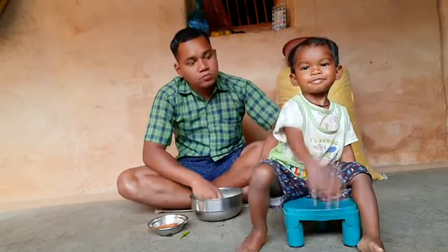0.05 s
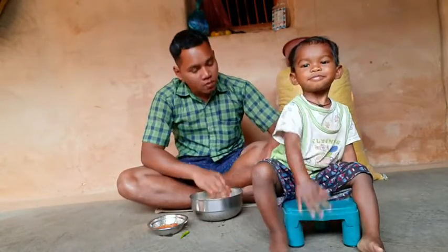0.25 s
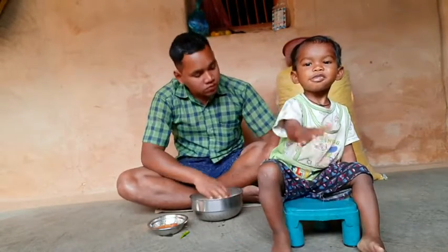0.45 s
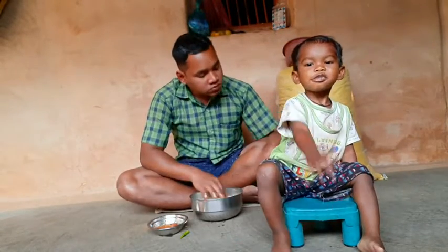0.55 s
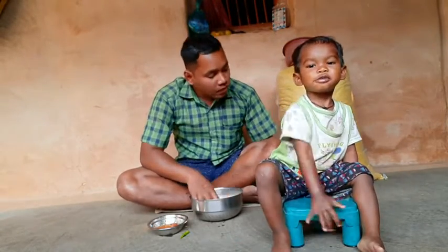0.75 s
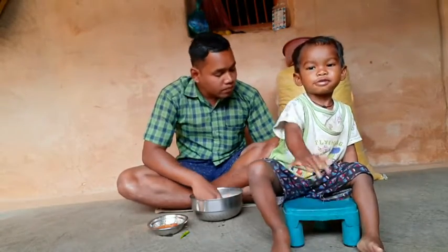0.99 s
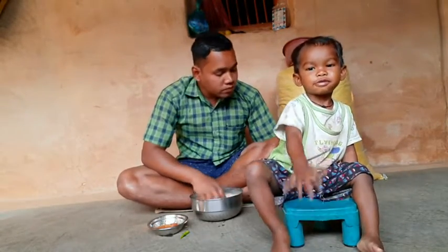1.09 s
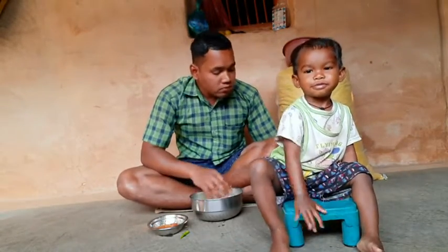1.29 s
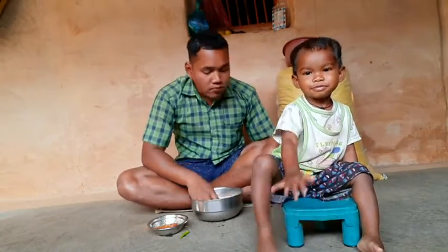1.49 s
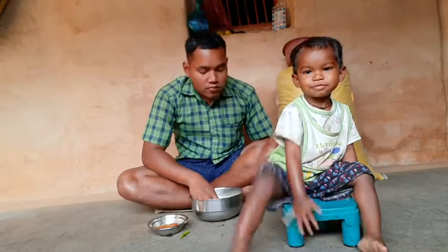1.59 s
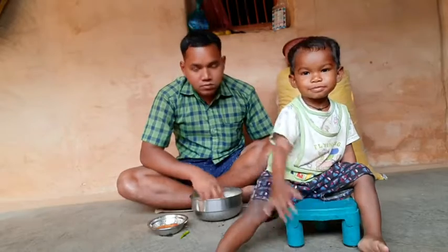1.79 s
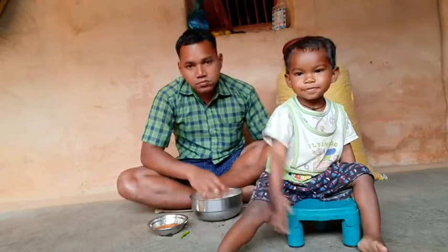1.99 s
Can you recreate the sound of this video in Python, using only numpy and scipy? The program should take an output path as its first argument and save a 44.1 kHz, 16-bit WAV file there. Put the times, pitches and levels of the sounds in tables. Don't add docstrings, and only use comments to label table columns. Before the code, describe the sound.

A child's hand slaps a hollow plastic stool, one hard hit then lighter uneven ones, with skin snaps and faint wet ticks; stool legs scrape at start and end. Close stereo microphone, small bare room, low hum.

```python
import sys
import numpy as np
from scipy import signal
from scipy.fft import rfft, irfft, next_fast_len
from scipy.io import wavfile
from scipy.ndimage import uniform_filter1d, map_coordinates

SR = 44100
rng = np.random.default_rng(int(sys.argv[2]) if len(sys.argv) > 2 else 0)


def boost_factor(decibels):
    exponent = np.asarray(decibels, float) / 20
    return 10 ** exponent


def unload_wav(signal):
    wavfile.write(
        sys.argv[1],
        SR,
        np.round(np.clip(np.atleast_2d(signal).T, -1, 1) * 32767).astype(np.int16),
    )


N = 90404

# frequency in Hz, level in dB, decay time t60 in seconds, rim share 0-1.
STOOL_MODES = [(109.3, 10, 0.22, 0.26), (176.7, -5.5, 0.22, 0.59), (253.6, 4, 0.2, 0.31),
               (347.6, 3.5, 0.15, 0.93), (420.4, 2, 0.17, 0.37), (481, -17.5, 0.32, 0),
               (499.1, -4, 0.21, 0.04), (542.5, -2.5, 0.174, 0.26), (597.8, -14.5, 0.31, 0.99),
               (649, -27, 0.16, 0.1), (679, -27, 0.38, 1), (953, -15.5, 0.1, 0), (667, -41, 0.023, 0.2)]
RISE_S = 0.0021


def ringing(centre_hz, width_oct, rim_db, ring):
    t = np.arange(SR // 2) / SR
    hz, db, t60, rim = np.transpose(STOOL_MODES)[..., None]
    octaves_off = np.log2(hz / centre_hz) / width_oct
    weight_db = db + rim * rim_db - 6 * octaves_off ** 2
    decay = boost_factor(weight_db - 60 * t / (ring * t60))
    modes = decay * np.sin(2 * np.pi * hz * t)
    return modes.sum(0) * (1 - np.exp(-t / RISE_S)) ** 2


# start in seconds, level in dB, centre of the push in Hz,
# rim mode level in dB, ring length 0-1 as the hand damps it.
SLAPS = [(.245, -21.5, 407, -21, 0.78), (.257, -28, 547, -3, 0.61), (.242, -45, 381, 10, 0.26),
         (0.779, -32, 467, -15, 0.37), (.791, -28.5, 493, -6.5, 0.57), (.797, -42, 403, -10, 0.2),
         (.79, -53, 100, -2, 0.61), (1.073, -38.5, 320, 6, 0.34), (1.091, -47, 363, 10.5, 0.54),
         (1.106, -52, 600, 9.5, 0.39), (1.322, -27, 422, -5, 0.9), (1.337, -30.5, 420, -6, 0.51),
         (1.328, -42, 300, -9, 0.2), (1.585, -35.5, 365, 6.5, 0.34), (1.599, -32.5, 396, -14, 0.07),
         (1.618, -40, 610, 11.5, 0.22), (1.731, -37, 525, 0.5, 0.58), (1.746, -43, 313, 12, 0.25),
         (1.765, -46, 400, 4, 0.26), (1.784, -52, 151, -6, 0.36), (1.799, -49, 255, 3, 0.53),
         (1.812, -50.5, 257, 14.5, 0.24), (1.826, -53.5, 300, 0, 0.47)]
PUSH_OCT = 0.96
SEAT_DIP_HZ, SEAT_DIP_Q, SEAT_DIP = 790, 2.5, 0.85


def slapped_seat():
    out = np.zeros(N + SR)
    for s, db, hz, rim_db, ring in SLAPS:
        out[round(s * SR):][:SR // 2] += boost_factor(db) * ringing(hz, PUSH_OCT, rim_db, ring)
    dip = resonance(SEAT_DIP_HZ, SEAT_DIP_Q)
    return filtered(out[:N], lambda f: 1 - SEAT_DIP * dip(f))


# time in seconds, level in dB.
DRAG = [
    (0, -71.5),
    (.08, -68.5),
    (.13, -57),
    (.19, -67),
    (.3, -87),
    (1.55, -79.5),
    (1.63, -64),
    (1.7, -64.5),
    (1.78, -48.5),
    (1.92, -87),
]
DRAG_HZ, DRAG_OCT, DRAG_RING, DRAG_RIM_DB = 203, 0.74, 0.32, 4.5
SCUFF_HZ, SCUFF_Q, SCUFF_DB = 217.8, 1.5, -2


def dragged_legs():
    drag_s, drag_db = np.transpose(DRAG)
    level_db = np.interp(np.arange(N) / SR, drag_s, drag_db)
    slips = unit(boost_factor(0.69 * wobble(90)) * rng.standard_normal(N))
    scuff = boost_factor(level_db + SCUFF_DB) * unit(filtered(slips, resonance(SCUFF_HZ, SCUFF_Q)))
    body = ringing(DRAG_HZ, DRAG_OCT, DRAG_RIM_DB, DRAG_RING)
    shaken = signal.fftconvolve(slips * boost_factor(level_db), body / np.linalg.norm(body))[:N]
    return scuff + shaken


# start in seconds, level in dB, hollow frequency in Hz,
# hollow over hiss in dB, length t60 in seconds.
SNAPS = [(0.2418, -35.5, 1436, 6.5, 0.016), (.243, -29.5, 4880, -11, 0.0073), (.243, -41, 3170, 14, 0.0054),
         (.244, -34.5, 8450, 8, .006), (0.294, -48, 4580, -1.5, 0.056), (.31, -59, 4530, 1, .015),
         (0.345, -60, 1500, 13, 0.009), (0.755, -62, 1500, 22, 0.0075), (.767, -67, 1510, 17, 0.011),
         (0.775, -48, 3530, 1.5, 0.018), (.779, -59.5, 1420, 17.5, .01), (0.789, -56.5, 4940, 6.5, 0.0097),
         (0.801, -62, 910, 21, 0.022), (1.083, -79, 1830, 22, 0.023), (1.094, -67.5, 1710, 20, 0.009),
         (1.32, -44, 4770, 0, 0.0099), (1.321, -51, 8300, 15, 0.0063), (1.319, -60.5, 1460, 14.5, 0.013),
         (1.581, -67.5, 1380, 19, 0.012), (1.584, -61, 1960, 17, 0.021), (1.716, -58, 8700, -5, 0.02),
         (1.731, -45, 3210, 10, 0.011), (1.730, -54, 6100, -6, 0.0063), (1.794, -51.5, 4970, 2, 0.0098),
         (1.826, -58, 3100, 11, .01), (1.827, -60, 7500, 0, 0.0073), (1.836, -70, 3300, 14, 0.0089),
         (1.847, -63, 4750, 12, 0.013), (1.839, -64, 1740, 15, 0.01), (1.838, -60, 11100, 4, 0.032),
         (1.8476, -56, 1497, 18, 0.0099), (1.85, -59.5, 7400, 13.5, 0.013),
         (1.866, -67, 1150, 15.5, 0.0095)]
# start in seconds, level in dB, hollow frequency in Hz,
# hollow over hiss in dB, length t60 in seconds.
TICKS = [
    (.499, -49, 9500, -2, .009),
    (.504, -54, 8000, 2, .01),
    (.521, -46, 8500, -4, .009),
    (.739, -55, 7600, 0, .012),
    (.747, -49, 9200, -2, .022),
    (.426, -62, 12000, -6, .01),
]
# frequency in Hz, level in dB.
SNAP_COLOUR = [(900, -10), (1450, 23), (2200, -14), (3200, 14.5), (4000, -1), (5000, 3.5), (8500, -4.5),
               (15500, -9.5)]
SNAP_RISE_S, HISS_FROM = 0.00045, 0.6
HOLLOW_Q, HOLLOW_RISE_CYCLES, HOLLOW_CLEAR = 3.5, 1.95, 0.62
SNAP_WET_DB, HOLLOW_WET_DB = -4, -12


def snaps():
    out = np.zeros((2, N + SR))
    t = np.arange(SR // 4) / SR
    for s, db, hz, hollow_db, t60 in SNAPS + TICKS:
        burst = rng.standard_normal(len(t))
        burst = filtered(burst, lambda f: boost_factor(along(SNAP_COLOUR, f)) / (1 + (HISS_FROM * hz / (f + 1)) ** 4))
        hiss = boost_factor(-60 * t / t60) * (1 - np.exp(-t / SNAP_RISE_S)) * unit(burst)
        blur = unit(filtered(rng.standard_normal(len(t)), resonance(hz, HOLLOW_Q)))
        tone = HOLLOW_CLEAR * np.sin(2 * np.pi * hz * t) + (1 - HOLLOW_CLEAR) * blur
        build_up = 1 - np.exp(-(t * hz / HOLLOW_RISE_CYCLES) ** 2)
        hollow = boost_factor(hollow_db - 60 * t / t60 / 2) * build_up * tone
        wet = boost_factor(SNAP_WET_DB) * room(hiss + boost_factor(HOLLOW_WET_DB) * hollow)
        out[:, round(s * SR):][:, :len(t)] += boost_factor(db) * (placed(hiss + hollow) + wet)
    return out[:, :N]


# start in seconds, hold in seconds, level in dB, brightest frequency in Hz,
# fade t60 in seconds.
STROKES = [
    (0.248, 0.067, -54.5, 4500, 0.31),
    (0.744, 0.017, -56.5, 7140, 0.1),
    (.78, 0.02, -59, 3270, 0.19),
    (0.838, 0.025, -70.5, 7300, 0.5),
    (1.323, 0.0087, -58.5, 3000, 0.31),
    (1.718, 0.071, -59.5, 11000, 0.24),
    (1.728, 0.049, -58.5, 3200, 0.28),
    (1.998, 0.18, -79.5, 7900, 0.22),
]
# start in seconds, hold in seconds, level in dB,
# brightest frequency in Hz, fade t60 in seconds.
SWELLS = [(1.68, 0.046, -61.5, 11000, 0.09), (-.05, 0.098, -75.5, 8140, 0.16),
          (0.15, 0.095, -72, 10000, 0.18), (.195, 0.041, -69.5, 3360, .1), (.19, 0.063, -80, 1590, 0.15),
          (0.338, 0.01, -76, 3240, 0.052), (.455, 0.079, -79, 1399, 0.11), (.46, 0.088, -71, 9000, .06),
          (0.559, 0.2, -76, 8200, 0.12), (0.872, 0.14, -73.5, 8100, 0.66), (1.049, 0.072, -77, 1490, 0.13),
          (1.21, 0.086, -86, 1190, 0.12), (1.522, 0.14, -69.5, 8600, 0.31)]
# start in seconds, hold in seconds, level in dB,
# brightest frequency in Hz, fade t60 in seconds.
PATS = [
    (1.712, 0.011, -70, 2800, .1),
    (1.582, .02, -69.5, 1440, .25),
    (.255, 0.044, -66.5, 1400, 0.13),
    (1.581, 0.018, -64.5, 1680, 0.25),
    (1.583, 0.029, -66, 3100, .3),
    (1.824, 0.0082, -59.5, 3840, 0.17),
    (1.836, 0.014, -66.5, 10500, 0.092),
    (.746, 0.061, -74.5, 1660, 0.086),
]
# start in seconds, hold in seconds, level in dB,
# brightest frequency in Hz, fade t60 in seconds.
AFTER_TICK = (.526, .012, -69, 7500, .2)
# frequency in Hz, level in dB.
RUB_COLOUR = [(500, 10), (1500, 4), (4000, 0), (5500, -3), (8500, 0.5), (12000, -7.5), (15500, -10.5)]
# frequency in Hz, likeness -1 to 1.
RUB_ALIKE = [(800, 0.44), (4000, 0.098), (12000, 0.088)]
# frequency in Hz, left over right
# in dB.
RUB_BALANCE = [(1000, 2), (4000, -2), (8000, -4), (13000, 19)]
RUB_GRAIN_DB, RUB_PATCHY_DB = 2, 2.2
STROKE_RISE_S, STROKE_OCT = 0.0037, 1.76
FAINT_RISE_S, FAINT_OCT = 0.045, 0.7
PAT_RISE_S, PAT_OCT = 0.003, 0.6


def rustle():
    t = np.arange(N) / SR
    grain = unit(boost_factor(RUB_GRAIN_DB * wobble(400) + 0.78 * wobble(60.1)))
    hiss = grain * rush(RUB_COLOUR, RUB_ALIKE, RUB_PATCHY_DB)
    kinds = [(STROKES, STROKE_RISE_S, STROKE_OCT),
             (SWELLS, FAINT_RISE_S, FAINT_OCT),
             (PATS + [AFTER_TICK], PAT_RISE_S, PAT_OCT)]
    out = 0
    for rows, rise, width in kinds:
        for s, held, db, hz, t60 in rows:
            fade = boost_factor(-60 * np.clip(t - s - held, 0, 1) / t60)
            shape = np.clip((t - s) / rise, 0, 1) * fade
            colour = unit(filtered(hiss, lambda f: boost_factor(-6 * (np.log2((f + 1) / hz) / width) ** 2)))
            out = out + boost_factor(db) * shape * colour
    side = np.array([[.5], [-.5]])
    return filtered(out, lambda f: boost_factor(along(RUB_BALANCE, f) * side))


# frequency in Hz, decay time t60 in seconds.
ROOM = [(150, 0.25), (1000, 0.32), (4000, 0.074), (12000, 0.14)]
# frequency in Hz, likeness -1 to 1.
ROOM_ALIKE = [(100, 0.7), (400, 0.77), (1500, 0.26), (8000, 0.033)]


def room(x):
    hz, t, z = signal.stft(rng.standard_normal((2, SR // 3)), SR, nperseg=256)
    decay = boost_factor(-60 * t / along(ROOM, hz)[:, None])
    tail = signal.istft(z * decay, SR, nperseg=256)[1]
    tail = paired(tail, np.ones_like, ROOM_ALIKE)
    late = np.pad(x, (180, 0))[None]
    return signal.fftconvolve(late, tail / np.linalg.norm(tail[0]), axes=1)[:, :len(x)]


# frequency in Hz, level in dB.
HUM = [(12, -121), (20, -10.5), (116, 1.5), (795, -23.5), (3120, -28.5), (3690, -29), (4010, -36),
       (8520, -30), (15700, -35)]
# frequency in Hz, likeness -1 to 1.
HUM_ALIKE = [(25, -0.43), (60, 1), (240, 0.15), (950, -0.016), (3770, -0.12), (15000, 0.17)]
HUM_DB, HUM_SWAY_DB = -68.5, 1.5


def background_hum():
    sway = boost_factor(HUM_DB + HUM_SWAY_DB * wobble(5.84))
    return sway * rush(HUM, HUM_ALIKE, patchy_db=-1.0)


def rush(spectrum, alike, patchy_db):
    z = signal.stft(rng.standard_normal((2, N)), nperseg=512)[2]
    field = uniform_filter1d(rng.standard_normal(z.shape[1:]), 6, 0)
    field = uniform_filter1d(field, 8, 1)
    pair = signal.istft(z * boost_factor(patchy_db * unit(field)), nperseg=512)[1][:, :N]
    return unit(paired(pair, lambda hz: boost_factor(along(spectrum, hz)), alike))


def paired(pair, response, alike):
    def mix(hz):
        angle = np.arccos(np.clip(along(alike, hz), -1, 1)) / 2
        return response(hz) * np.array([np.cos(angle), np.sin(angle)])
    mid, side = filtered(pair, mix)
    return np.array([mid + side, mid - side])


SEAT_PAN_DB, LAG_S = -1.5, 0.00018


def placed(x):
    side = np.array([[.5], [-.5]])
    gain = boost_factor(side * SEAT_PAN_DB)
    return filtered(x[None], lambda hz: gain * np.exp(-2j * np.pi * hz * (.5 - side) * LAG_S))


def resonance(hz, q):
    def response(f):
        damping = 1j * f * hz / q
        return (damping / (hz * hz - f * f + damping)) ** 2
    return response


def filtered(x, response):
    m = next_fast_len(x.shape[-1] + 8192)
    return irfft(rfft(x, m) * response(np.fft.rfftfreq(m, 1 / SR)), m)[..., :x.shape[-1]]


def along(points, hz):
    f, v = np.transpose(points)
    return np.interp(np.log(hz + 1), np.log(f + 1), v)


def wobble(rate):
    knots = rng.standard_normal(int(N * rate / SR) + 4)
    return map_coordinates(knots, [np.arange(N) * rate / SR])


def unit(x):
    return x / np.sqrt(np.mean(x ** 2) + 1e-20)


SEAT_WET_DB = -13


def scene():
    stool = slapped_seat() + dragged_legs()
    stool_in_room = placed(stool) + boost_factor(SEAT_WET_DB) * room(stool)
    return stool_in_room + snaps() + rustle() + background_hum()


def roll_off(x):
    return signal.sosfilt(signal.butter(12, 15800, fs=SR, output="sos"), x)


def record(dry):
    mix = filtered(dry, lambda hz: hz < 15750)
    return roll_off(mix)


dry = scene()
out = record(dry)
unload_wav(out)
```